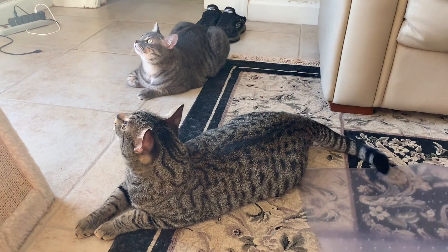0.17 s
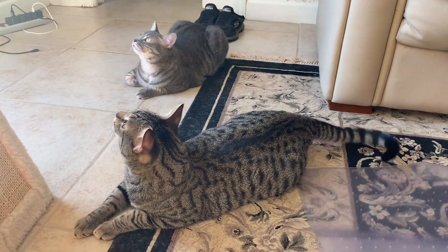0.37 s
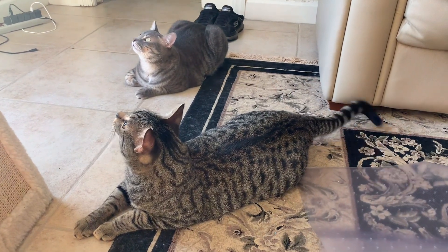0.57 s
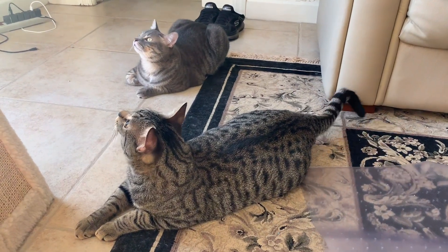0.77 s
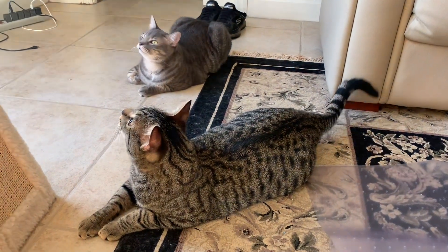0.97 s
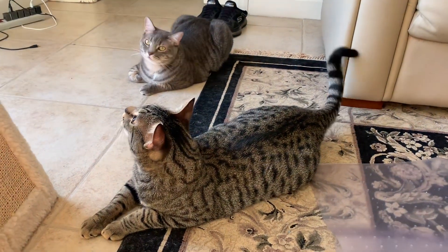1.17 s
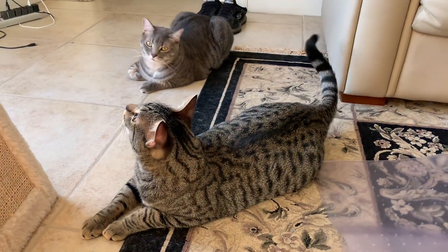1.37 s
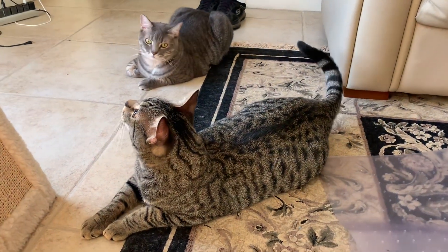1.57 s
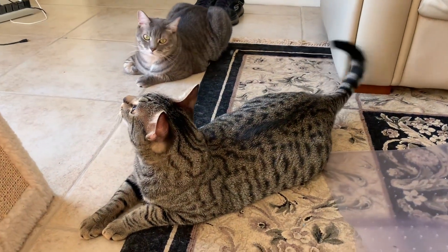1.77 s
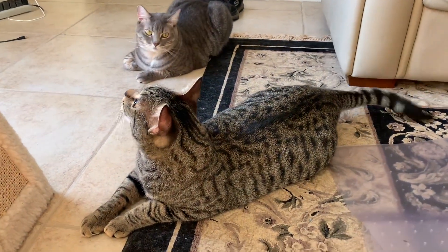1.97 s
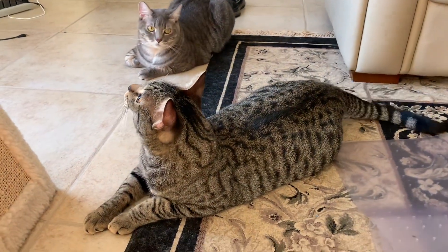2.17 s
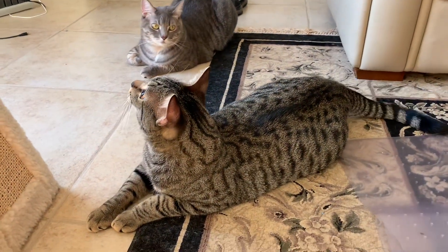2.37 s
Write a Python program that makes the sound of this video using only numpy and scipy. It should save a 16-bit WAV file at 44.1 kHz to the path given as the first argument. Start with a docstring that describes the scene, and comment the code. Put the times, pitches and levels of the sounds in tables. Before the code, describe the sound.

A cat chirps briefly at the start and again about a second in, each thin note breaking into a rasp and a lower note, with mouth clicks; close stereo microphone, quiet humming living room.

```python
"""Hum, rumble and rush of a living room run throughout, as filtered noise and slowly wavering sines.
A cat on the floor chirps at 0.1 s and 1 s: a thin near-sine behind closed lips, a smack of ringing modes,
a rasp of grainy noise where the voice breaks, then a lower note rich in overtones.
Between the chirps come a faint whistle of narrow noise, a dull sine bump and a mouth click; after them
come two tiny high ticks of noise, a last click and a swell of the lower midrange."""
import sys
import numpy as np
from scipy import signal
from scipy.fft import rfft, irfft, next_fast_len
from scipy.io import wavfile
from scipy.ndimage import map_coordinates

SR = 44100
rng = np.random.default_rng(int(sys.argv[2]) if len(sys.argv) > 2 else 0)


def wav_record(signal):
    """Record a signal, one row per channel, as 16-bit PCM in the file named by sys.argv[1]."""
    frames = np.transpose(np.atleast_2d(signal))
    bounded = np.clip(frames, -1, 1)
    # unit amplitude maps onto the largest positive 16-bit level
    quanta = np.round(bounded * 32767).astype(np.int16)
    wavfile.write(sys.argv[1], SR, quanta)


N = 111132
T = np.arange(N) / SR

# Room rumble and air hiss spectra. Each row: frequency in Hz, relative density in dB.
RUMBLE_SPECTRUM = [(15, -30.5), (25, -15), (39, -19), (49, 1.5), (97, 0), (141, -4.5), (162, -14.5),
                   (193, -9.5), (284, -16.5), (409, -17.5), (500, -29.5), (650, -67), (1100, -120)]
AIR_SPECTRUM = [(300, -11.5), (600, -12), (1500, 10), (2200, -6), (3000, -9.5), (4500, -12.5), (7000, -15),
                (8500, -27), (10000, -13.5), (12000, -15), (13500, -29), (15300, -15)]
RUMBLE_MEAN_DB, RUMBLE_RISE_DB_PER_S, AIR_DB = -47, 1.03, -68
# Course of the midrange rush. Each row: time in s, level in dB before RUSH_LIFT_DB.
RUSH_COURSE = [(0.0, -61.5), (0.2, -61.5), (0.71, -66), (1.09, -60.5), (1.32, -65), (2.18, -62.5),
               (2.52, -58)]
# Rush spectrum. Each row: frequency in Hz, relative density in dB.
RUSH_SPECTRUM = [(300, -3), (500, 5.5), (1300, 2), (1650, -3), (2000, -43), (3000, -38)]
RUSH_LIFT_DB = 1
# Appliance hum. Each row: frequency in Hz, mean rms level in dB.
HUM_TONES = [(92, -60.5), (234, -69), (405, -73.5)]
HUM_LAG_S = .00027  # the room noise reaches the right microphone later
# Likeness of the room noise at both microphones. Each row: frequency in Hz, correlation (0 to 1).
STEREO_LIKENESS = [(60, 0.96), (150, 0.94), (350, 0.72), (700, 0.69), (1400, 0.45), (2800, 0.07),
                   (6000, 0.32), (12000, 0.014)]
# Phase between the microphones. Each row: frequency in Hz, lead of the left in radians.
LEFT_LEAD = [(400, 0.14), (900, 0.77), (1700, 0.73), (2000, 1.74), (2700, 2.68), (3400, 0.53), (5000, 2.15),
             (7000, 1.7), (10000, 1.37), (15000, 0.53)]
# Decay of the room's tail. Each row: frequency in Hz, time to fall 60 dB in s.
ROOM_DECAY = [(300, 0.5), (900, 0.4), (1700, 0.46), (2400, 0.52), (3100, 0.29), (6000, 0.36),
              (11000, 0.092)]
TAIL_SHARED = .44  # power share of the tail that both microphones hear alike
TAIL_ONSET_S = .0039

# Voice, one table per chirp. Each row: time in s, pitch in Hz, level of the fundamental in dB rms,
# second harmonic in dB re the first.
CHIRP_COURSES = [
    [(.121, 905.6, -66, -30), (.126, 904, -50.5, -28), (.136, 943.6, -50.5, -19), (.150, 974.5, -54.5, -22),
     (.197, 957, -54.5, -19), (.212, 932, -78, -3), (.222, 866, -60, -1), (.231, 905, -49, -6.5),
     (.242, 841, -51, 5.5), (.252, 872, -52.5, 2), (.263, 847, -54, -9), (.269, 850, -72, -22)],
    [(.990, 970, -55, -15), (.995, 984, -47, -18), (1.003, 987, -46, -13), (1.012, 962, -48.5, -10),
     (1.023, 957, -47.5, -8), (1.031, 965, -54, -3), (1.039, 960, -55, -10), (1.064, 955, -54, -15),
     (1.075, 948, -75, -2), (1.094, 832, -70, -3), (1.105, 820, -51.5, -1), (1.119, 811, -54, -9),
     (1.130, 810, -58, -8)],
]
JITTER_FRACTION, SHIMMER_DB = .006, .8
# Upper harmonics of the open-mouthed note. Each row: multiple of the pitch, dB re the second
# harmonic where that is as strong as the first.
OPEN_OVERTONES = [(3, -17), (4, -36), (5, -31), (6, -26), (7, -34)]
OPEN_BELOW_HZ = 910
OVERTONE_GROWTH_DB_PER_DB = .96
VOICE_WET_DB, VOICE_PAN_DB = -14, 2

# Rasp, one table per chirp. Each row: time in s, level in dB, gliding resonance in Hz.
RASP_COURSES = [
    [(.194, -65, 4660), (.204, -62, 4730), (.211, -55.5, 4780), (.228, -61, 4850), (.240, -67.5, 5320),
     (.256, -58, 5430), (.272, -67, 5200), (.295, -67, 5070)],
    [(1.053, -49, 3896), (1.060, -54, 4083), (1.067, -48.5, 4600), (1.078, -53, 5500), (1.090, -56, 5710),
     (1.110, -63, 5370), (1.135, -77, 5330)],
]
# Top edge of each rasp in Hz, one per chirp.
RASP_TOP_EDGES_HZ = [6400, 6800]
# Rasp spectrum. Each row: frequency in Hz, relative density in dB.
RASP_SPECTRUM = [(400, 0), (900, -4), (1500, 1), (2100, 5), (2700, -1.5), (3200, -11), (3900, -9.5),
                 (5500, -11.5), (6800, -11), (8500, -36), (10000, -20), (15000, -27)]
# Mouth resonances. Each row: centre in Hz, width in octaves, gain in dB.
MOUTH_RESONANCES = [(2560, 0.13, 5.5), (3850, 0.04, 4.5), (5000, 0.07, 4), (6780, 0.061, 6.5),
                    (8030, 0.037, 15)]
EDGE_STEP_DB, EDGE_OCT = -8, .021
GLIDE_DB, GLIDE_OCT = -9, .12  # level re the hiss, width at the starting pitch
RASP_FADE_S, RASP_GRAIN_DEPTH, RASP_GRAINS_PER_S = .002, .28, 600
RASP_WET_DB, RASP_PAN_DB = -7.5, -1

# Mouth clicks. Each row: start in s, level in dB, low mode in Hz, high mode in Hz, middle mode, high mode
# and crack in dB re the low mode, left re right in dB, room tail in dB re direct.
CLICK_EVENTS = [(0.2048, -44.5, 1750, 2620, -6, -3, 1.5, 0, -9),
                (0.9190, -40, 1440, 2990, -36, -9.5, -33, 6, -16),
                (1.0533, -37.5, 1560, 2820, -3, -7, -3, 3, -7),
                (2.4368, -36, 1320, 2850, -6, -13, -17, 2, -12)]
# Crack spectrum. Each row: frequency in Hz, relative density in dB.
CRACK_SPECTRUM = [(500, -40), (1800, 17), (4000, 11), (5000, 0), (6500, -9), (9000, -14), (15000, -22)]
MID_MODE_HZ = 1897
CLICK_ATTACK_S, CLICK_T60_S, CRACK_T60_S = .0009, .018, .009

# Thin whistle. One row: centre time in s, half length in s, peak level in dB, pitch in Hz, width in octaves.
WHISTLE_EVENT = (.565, .035, -81, 3500, .02)
# Low bumps. Each row: start in s, peak level in dB, pitch in Hz.
THUMP_EVENTS = [(.905, -45, 178)]
THUMP_RISE_S = .015

# High ticks. Each row: start in s, level in dB, pitch in Hz, width in octaves.
TICK_EVENTS = [(2.0066, -44.5, 9940, 0.078), (2.4677, -59.5, 11100, 0.2)]
TICK_S, TICK_SKIRT_DB, TICK_SKIRT_HZ, TICK_SKIRT_OCT = .0021, -26, 7440, .6
# Echoes off the nearest walls. Each row: delay in s, level in dB re direct.
WALL_ECHOES = [(.0055, -15), (.0100, -16), (.0152, -25), (.0230, -20), (.0342, -18)]
TICK_WET_DB = -12

# Late swell of the lower midrange. Each row: time in s, level in dB.
SWELL_COURSE = [(2.05, -85), (2.14, -65.5), (2.24, -76.5), (2.36, -64.5), (2.52, -63)]
SWELL_HZ, SWELL_OCT = 747, .18

TOP_HZ = 15750


def amp(db):
    """Decibels to gain."""
    return 10 ** (np.asarray(db) / 20)


def unit(x):
    """Scale to rms 1."""
    return x / np.sqrt(np.mean(x ** 2) + 1e-20)


def along(points, hz):
    """Interpolate (Hz, value) points on a log axis."""
    f, v = np.transpose(points)
    return np.interp(np.log(hz + 1), np.log(f + 1), v)


def wobble(knots_per_s):
    """A smooth random curve."""
    knots = rng.standard_normal(int(N * knots_per_s / SR) + 4)
    return map_coordinates(knots, [T * knots_per_s])


def filtered(x, response):
    """Multiply the spectrum of x by response(hz)."""
    m = next_fast_len(N + SR // 2)
    return irfft(rfft(x, m) * response(np.fft.rfftfreq(m, 1 / SR)), m)[..., :N]


def bump(hz, centre_hz, octaves):
    """A bell of height 1 on a log axis."""
    return np.exp(-.5 * (np.log2((hz + 1) / centre_hz) / octaves) ** 2)


def noise(gain):
    """Noise of rms 1 with a given gain over frequency."""
    return unit(filtered(rng.standard_normal(N), gain))


def wide_noise(spectrum):
    """Stereo noise of rms 1; the mid-side balance sets the likeness at each frequency."""
    def mid_side_gain(hz):
        angle = np.arccos(np.clip(along(STEREO_LIKENESS, hz), -1, 1)) / 2
        return amp(along(spectrum, hz)) * [np.cos(angle), np.sin(angle)]

    mid, side = filtered(rng.standard_normal((2, N)), mid_side_gain)
    return unit(np.array([mid + side, mid - side]))


def panned(x, left_re_right_db):
    """Onto two microphones: a level difference, and the left a little ahead in phase."""
    sign = np.array([[1], [-1]])
    return filtered(x, lambda hz: amp(sign * left_re_right_db / 2)
                    * np.exp(.5j * along(LEFT_LEAD, hz) * sign))


def in_room(x, wet_db):
    """Direct sound plus a diffuse tail of decaying noise, partly alike on both sides."""
    hz, t, z = signal.stft(rng.standard_normal((3, SR // 2)), SR, nperseg=256)
    z = np.sqrt(1 - TAIL_SHARED) * z[:2] + np.sqrt(TAIL_SHARED) * z[2]
    decay = amp(-60 * t / along(ROOM_DECAY, hz)[:, None])
    onset = 1 - np.exp(-t / TAIL_ONSET_S)
    tail = signal.istft(z * decay * onset, SR, nperseg=256)[1]
    tail /= np.linalg.norm(tail[0])
    return x + amp(wet_db) * signal.fftconvolve(x, tail, axes=1)[:, :N]


def room_tone():
    """Rising low rumble, wavering appliance hum, a slowly changing rush and thin hiss."""
    hum = np.zeros(N)
    for db, hz in [(db, hz) for hz, db in HUM_TONES]:
        level = np.sqrt(2) * amp(db + .53 * wobble(3.0))
        hum += level * np.sin(2 * np.pi * hz * T + .5 * wobble(4.63))
    rush_db = np.interp(T, *np.transpose(RUSH_COURSE)) + RUSH_LIFT_DB
    rush = amp(rush_db) * wide_noise(RUSH_SPECTRUM)
    rumble_db = RUMBLE_MEAN_DB + RUMBLE_RISE_DB_PER_S * (T - T.mean())
    rumble = amp(rumble_db) * wide_noise(RUMBLE_SPECTRUM)
    left, right = hum + rumble + rush + amp(AIR_DB) * wide_noise(AIR_SPECTRUM)
    return np.array([left, np.interp(T - HUM_LAG_S, T, right)])


def voice():
    """A nearly pure tone; as the mouth opens, the upper overtones grow faster than the second harmonic."""
    out = np.zeros(N)
    for chirp in CHIRP_COURSES:
        s, *columns = np.transpose(chirp)
        hz, db, second_db = [np.interp(T, s, c) for c in columns]
        phase = 2 * np.pi * np.cumsum(hz * (1 + JITTER_FRACTION * wobble(300))) / SR
        gate = np.clip(np.minimum(T - s[0], s[-1] - T) / .0028, 0, 1)
        upper = sum(amp(level_db + OVERTONE_GROWTH_DB_PER_DB * second_db) * np.sin(k * phase)
                    for k, level_db in OPEN_OVERTONES)
        mouth_open = hz < OPEN_BELOW_HZ
        tone = np.sin(phase) + amp(second_db) * (np.sin(2 * phase) + mouth_open * upper)
        out += np.sqrt(2) * gate * amp(db + SHIMMER_DB * wobble(200)) * tone
    return panned(out, VOICE_PAN_DB)


def rasp():
    """Where the voice breaks, grainy noise sounds through the mouth; one resonance glides as the jaw moves."""
    out = np.zeros(N)
    for rows, edge_hz in zip(RASP_COURSES, RASP_TOP_EDGES_HZ):
        s, *columns = np.transpose(rows)
        db, glide_hz = [np.interp(T, s, c) for c in columns]
        gate = np.clip(np.minimum(T - s[0], s[-1] - T) / RASP_FADE_S, 0, 1)

        def hiss_gain(hz):
            mouth_db = sum(gain_db * bump(hz, centre, width) for centre, width, gain_db in MOUTH_RESONANCES)
            above_edge = (1 + np.tanh(np.log2((hz + 1) / edge_hz) / EDGE_OCT)) / 2
            return amp(along(RASP_SPECTRUM, hz) + mouth_db + EDGE_STEP_DB * above_edge)

        hiss = noise(hiss_gain)
        # a fixed noise band, shifted in frequency along the glide
        band = signal.hilbert(noise(lambda hz: bump(hz, glide_hz[0], GLIDE_OCT)))
        glide = np.real(band * np.exp(2j * np.pi * np.cumsum(glide_hz - glide_hz[0]) / SR))
        grain = 1 + RASP_GRAIN_DEPTH * wobble(RASP_GRAINS_PER_S)
        out += amp(db) * gate * unit((hiss + amp(GLIDE_DB) * glide) * grain)
    return panned(out, RASP_PAN_DB)


def mouth_clicks():
    """Lips and tongue part with a noise crack; three decaying modes ring the mouth cavity."""
    out = np.zeros((2, N))
    for s, db, low_hz, high_hz, mid_db, high_db, crack_db, pan_db, wet_db in CLICK_EVENTS:
        t = np.maximum(T - s, 0)
        modes = [(low_hz, 0), (MID_MODE_HZ, mid_db), (high_hz, high_db)]
        ring = sum(amp(mode_db) * np.sin(2 * np.pi * hz * t) for hz, mode_db in modes)
        ring = ring * amp(-60 * t / CLICK_T60_S)
        crack = amp(crack_db - 60 * t / CRACK_T60_S) * noise(lambda hz: amp(along(CRACK_SPECTRUM, hz)))
        attack = 1 - np.exp(-t / CLICK_ATTACK_S)
        out += in_room(panned(amp(db) * attack * (ring + crack), pan_db), wet_db)
    return out


def whistle():
    """A narrow band of noise that swells and fades."""
    s, half_s, db, pitch_hz, octaves = WHISTLE_EVENT
    envelope = amp(db) * np.exp(-.5 * ((T - s) / half_s) ** 2)
    return panned(envelope * noise(lambda hz: bump(hz, pitch_hz, octaves)), 0)


def thumps():
    """A dull bump: a low sine that swells within a few cycles, then dies away."""
    out = np.zeros(N)
    for s, db, hz in THUMP_EVENTS:
        t = np.maximum(T - s, 0)
        envelope = t / THUMP_RISE_S * np.exp(1 - t / THUMP_RISE_S)
        out += amp(db) * envelope * np.sin(2 * np.pi * hz * t)
    return out


def ticks():
    """Very short bursts of high noise, repeated faintly by the nearest walls."""
    out = np.zeros(N)
    for s, db, tick_hz, octaves in TICK_EVENTS:
        u = np.clip((T - s) / TICK_S, 0, 1)
        burst = rng.standard_normal(N) * np.sqrt(np.abs(np.sin(np.pi * u)))
        tick = filtered(burst, lambda hz: bump(hz, tick_hz, octaves)
                        + amp(TICK_SKIRT_DB) * bump(hz, TICK_SKIRT_HZ, TICK_SKIRT_OCT))
        # rms 1 over the length of the tick
        out += amp(db) * tick / np.linalg.norm(tick) * np.sqrt(TICK_S * SR)
    echoes = sum(amp(db) * np.interp(T - delay_s, T, out) for delay_s, db in WALL_ECHOES)
    return panned(out + echoes, 0)


def swell():
    """A band of lower-midrange noise that swells, dips and swells again late on."""
    level = amp(np.interp(T, *np.transpose(SWELL_COURSE)))
    return panned(level * noise(lambda hz: bump(hz, SWELL_HZ, SWELL_OCT)), 0)


def scene():
    """The cat, a faint whistle, a soft bump, ticks and a swell in the humming room."""
    cat = in_room(voice(), VOICE_WET_DB) + in_room(rasp(), RASP_WET_DB) + mouth_clicks()
    return room_tone() + cat + whistle() + thumps() + in_room(ticks(), TICK_WET_DB) + swell()


def record(dry):
    """Nothing is kept above the band limit."""
    return filtered(dry, lambda hz: hz < TOP_HZ)


dry = scene()
out = record(dry)
wav_record(out)
```